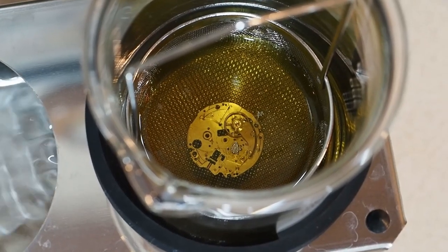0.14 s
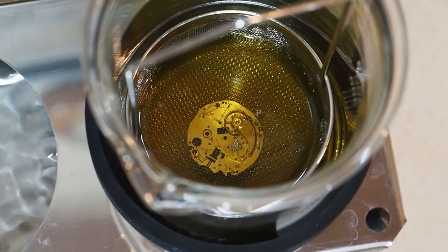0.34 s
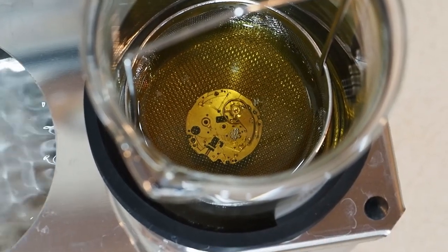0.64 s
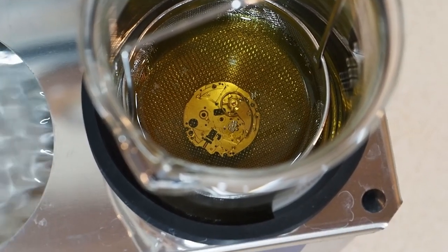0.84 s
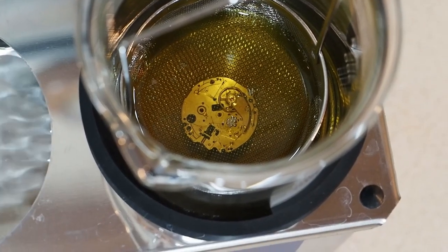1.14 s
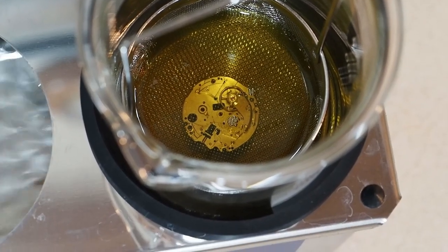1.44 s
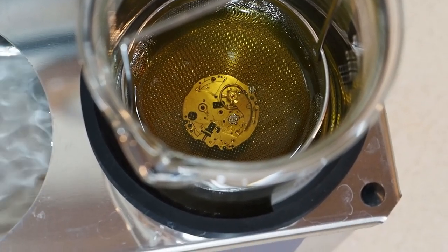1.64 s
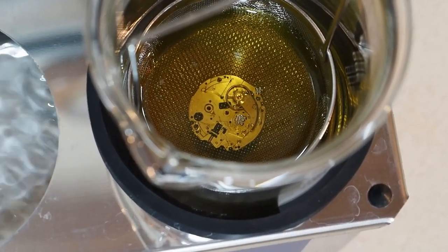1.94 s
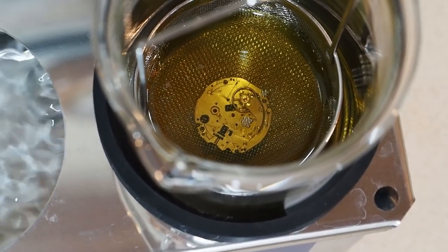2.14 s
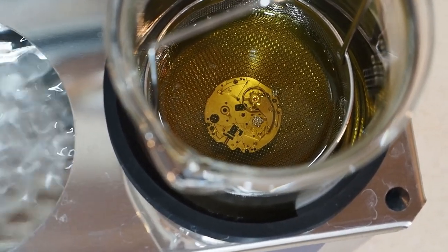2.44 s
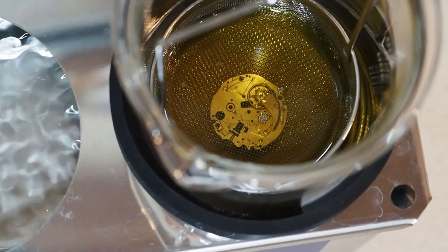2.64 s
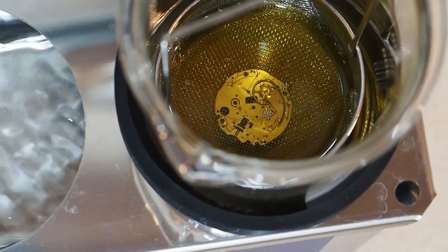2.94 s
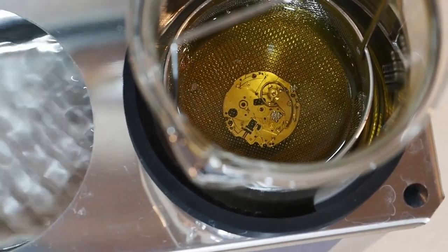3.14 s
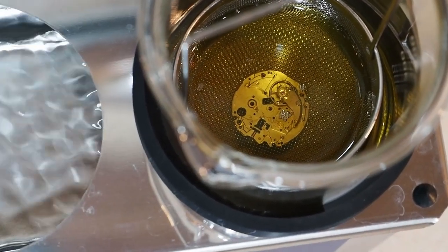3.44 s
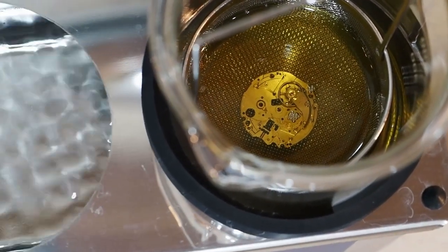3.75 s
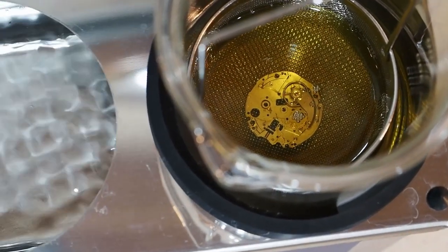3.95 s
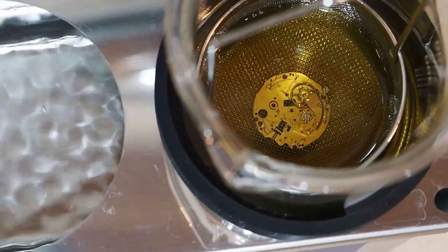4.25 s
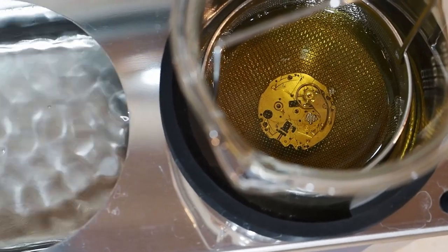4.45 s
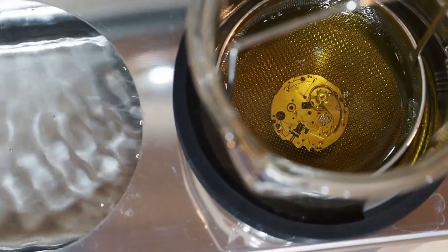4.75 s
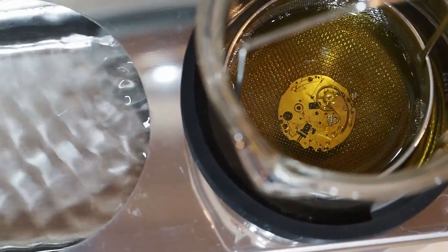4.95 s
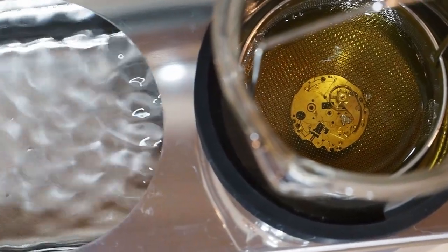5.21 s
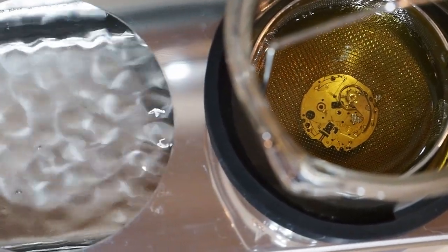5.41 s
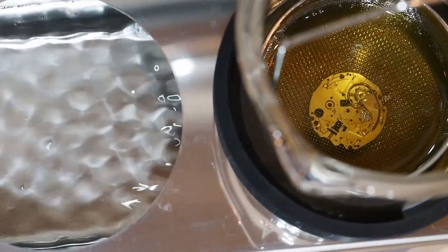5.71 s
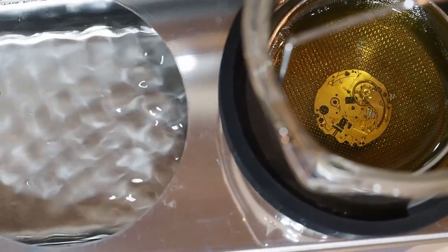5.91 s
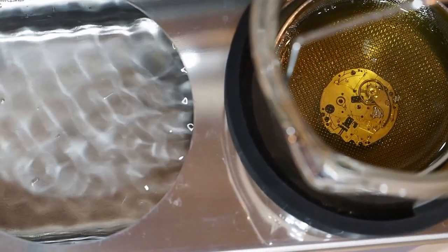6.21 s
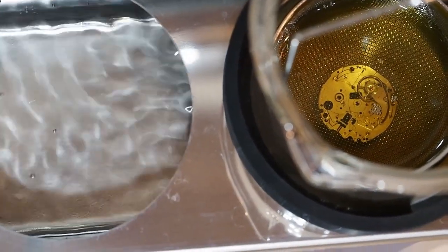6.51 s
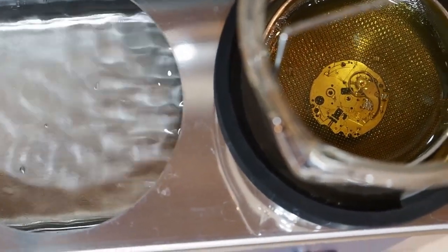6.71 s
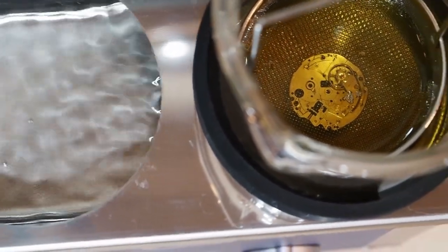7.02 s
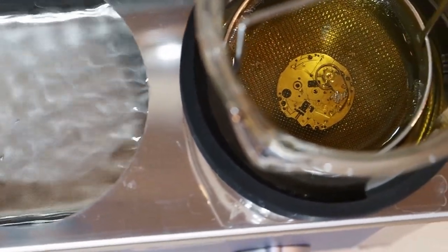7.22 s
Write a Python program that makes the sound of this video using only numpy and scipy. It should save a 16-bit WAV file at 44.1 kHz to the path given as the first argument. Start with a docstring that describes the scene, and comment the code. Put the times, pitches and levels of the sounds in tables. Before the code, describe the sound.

From 0 to about 7.4 seconds an ultrasonic cleaning bath runs without stopping, close to the microphone. It is a bright, dry hiss made of countless tiny bubble collapses, chopped into roughly fifty soft-edged bursts per second, so it buzzes and crackles. Most energy is a sharp fizz around 11 to 16 kHz, with crackle from 2 to 12 kHz and faint ringing of the steel tank. At 0.2 seconds the beaker knocks lightly, a short woolly click; a weaker touch comes at 2.5. The fizz flares briefly near 1.6, 2.5, 4.0, 5.5 and 6.5, with narrow, airy whistles around 2.6 and 6.1. Small dips at 1.6, 2.9, 3.6, 4.5 and 5.7 recover gradually. Faint mains hum and workshop rumble lie far below; a very soft low bump swells at 7.0. The room tail is short.

```python
"""A fast buzz of crackling bursts: an ultrasonic cleaner close by, a glass beaker standing in its steel tank.
The drive swells once per mains cycle and gates random collapses, coloured as crackle, fizz and ringing steel.
The housing hums at mains multiples over a faint workshop rumble, both steady tones and noise drifting slowly.
The beaker knocks lightly (short damped noise), bubble clouds whistle (narrow gated noise), and late on
a soft low bump swells and fades; now and then the whole sound sags and creeps back."""
import sys
import numpy as np
from scipy import signal
from scipy.fft import rfft, irfft, next_fast_len
from scipy.io import wavfile
from scipy.ndimage import uniform_filter1d, map_coordinates

SR = 44100
rng = np.random.default_rng(int(sys.argv[2]) if len(sys.argv) > 2 else 0)


def master(y):
    """Save y as 16-bit WAV."""
    cut = np.clip(np.atleast_2d(y).T, -1, 1)
    pcm = np.round(cut * 32767)  # scale
    wavfile.write(sys.argv[1], SR, pcm.astype(np.int16))


N = 325017

MAINS_HZ, START_PHASE = 50.09, 0.521  # phase as a share of the cycle
CRACKLE_DB, FIZZ_DB, TANK_DB = -44.5, -36.5, -63  # base levels of the bath's three layers
CRACKLE_SHARE = 0.22  # part of a surge's dB that reaches the larger collapses
SAG_S, RECOVER_DB_PER_S = 0.048, 5.5  # fall time and recovery rate of a lull
BUMP_S, BUMP_HALF_S, BUMP_DB = 7.02, 0.07, -60
TOP_HZ = 15830  # middle of the recorder's upper band edge

# strength of cavitation through one mains cycle: (share of the cycle, relative level [dB])
CYCLE_STRENGTH = [(0, -10), (.255, -12), (.34, -4.6), (.42, -1.5), (.49, -1.2), (0.591, -2.5), (0.69, -8),
                  (.82, -10)]
# larger collapses heard through the tank: (frequency [Hz], relative density [dB per Hz])
CRACKLE_COLOUR = [(880, -24), (1500, -20.5), (1970, -14.5), (2080, -13), (2550, -6.5), (3940, -6),
                  (4670, -9), (5010, -4.5), (5530, -5.5), (7150, 0), (8390, -3.5), (9410, 0.5),
                  (10400, 0.5), (11100, -3), (12500, -7.5), (16200, -50.5), (22000, -120)]
# the smallest bubbles: (frequency [Hz], relative density [dB per Hz])
FIZZ_COLOUR = [(9000, -43.5), (11300, -15.5), (11900, -6.5), (12500, -8.5), (13100, -4.5), (13900, 0.5),
               (14400, -5), (15130, 4), (15800, -2)]
# slow drift of the fizz: (time [s], level change [dB])
FIZZ_DRIFT = [(0, 0.17), (1.2, 0.6), (3.1, 0.5), (5.2, -0.5), (6.3, 0.2), (7.37, -1.34)]
# fizz and crackle flare up briefly: (time [s], half length [s], rise of the fizz [dB])
FIZZ_SURGES = [(1.25, 0.079, 1.3), (1.61, .06, 2.5), (2.533, 0.037, 2.2), (3.35, .07, -2.5),
               (3.96, 0.058, 3.5), (4.24, .07, 1.5), (5.46, 0.023, 4), (5.62, .03, 3.5), (6.5, 0.107, 3),
               (7.33, .12, 3)]
# ringing of the steel tank: (frequency [Hz], width [Hz], relative level [dB])
TANK_MODES = [(1161.7, 10, 0.5), (1230.4, 66, 1.5), (1368.7, 109, -6), (2127, 47, -3), (2316, 60, -1.5)]
# stereo width: (frequency [Hz], side minus mid [dB])
STEREO_WIDTH = [(60, -9.5), (130, -3.5), (290, -5.5), (640, -0.5), (1410, -22), (3100, -3.5), (6820, -3),
                (15000, 2)]
# decay of the room's tail: (frequency [Hz], t60 [s])
ROOM_DECAY = [(300, 0.23), (3000, 0.14), (15000, 0.096)]
# tank and room answer most in the midrange: (frequency [Hz], reverberant minus direct [dB])
REVERB_BALANCE = [(1200, -2.5), (2200, 1.5), (4000, -9.5), (8000, -18), (15000, -5.5)]
# housing vibration: (multiple of the mains, relative level [dB])
HUM_LINES = [(1, -8.5), (2, -6.5), (3, -27), (4, -4), (5, 2), (6, -4), (7, -6), (8, -9), (9, -17.5),
             (10, -26), (11, -11.5), (12, -11.5), (13, -12), (14, -34.5), (15, -21)]
# slow drift of the hum and the room's rush: (time [s], level change [dB])
LOW_DRIFT = [(0, -2), (.85, 2), (1.65, -1.62), (2.35, .7), (3.1, -.3), (3.55, 1.4), (4.65, -2), (5.1, 0.67),
             (7.37, -1.02)]
# rumble and rush of the workshop: (frequency [Hz], relative density [dB per Hz])
WORKSHOP_COLOUR = [(12, -39), (20, 4.5), (31, -13), (44, 3), (52, -6), (60, -1.5), (76, -9.5), (103, -1),
                   (165, -9), (247, -3.5), (274, -3.5), (352, -0.5), (476, -9.5), (633, -4.5), (813, -28),
                   (1100, -15), (1430, -16), (2420, -120)]
# deep part of the rumble: (time [s], level [dB])
DEEP_RUMBLE_LEVEL = [(0, -65), (.9, -64.5), (1.8, -65), (4.4, -66), (6.2, -66), (7.37, -66)]
# beaker against tank: (time [s], peak level [dB], frequency [Hz], width [Hz], t60 [s])
BEAKER_KNOCKS = [(0.195, -50.5, 760, 900, 0.045), (0.202, -38, 2390, 1500, 0.0306),
                 (0.258, -51, 1200, 70, .1), (2.517, -50, 1035, 260, 0.065)]
# bubble clouds that ring for a while: (time [s], half length [s], frequency [Hz], level [dB])
CLOUD_WHISTLES = [(1.19, 0.15, 15200, -41.5), (1.639, 0.032, 9560, -43), (2.595, 0.0028, 13900, -31),
                  (2.6, 0.062, 14250, -41), (2.752, 0.21, 9500, -51), (4.204, 0.15, 9590, -47.5),
                  (5.5, 0.064, 10600, -48.5), (6.102, 0.68, 10140, -49.5), (6.12, .05, 15100, -39.5),
                  (7.22, 0.2, 13800, -43)]
# sags of the whole sound: (time [s], hold [s], depth [dB])
LEVEL_LULLS = [(1.629, 0.27, 3), (2.903, 0.23, 1.5), (3.603, .14, 2.5), (4.283, 0.042, 1.5),
               (4.46, 0.21, 3.5), (5.686, 0.053, 2), (6.683, 0.3, -0.15)]
# colour of the soft bump: (frequency [Hz], relative density [dB per Hz])
BUMP_SPECTRUM = [(25, -12), (330, 1), (480, -3), (700, -12), (1300, -15), (3000, -60)]
# the beaker shades the top treble on the left: (frequency [Hz], left minus right [dB])
LEFT_RIGHT_LEAN = [(250, 1.3), (1000, -0.5), (1800, -3.5), (2800, 0.5), (8000, 0.5), (11800, -.7),
                   (13700, -6), (15500, -4)]


def amp(db):
    """Decibels to amplitude."""
    return 10 ** (np.asarray(db) / 20)


def unit(x):
    """x scaled to rms 1."""
    return x / np.sqrt(np.mean(x ** 2) + 1e-20)


def clock():
    """Time of every sample in seconds."""
    return np.arange(N) / SR


def along(points, hz):
    """(Hz, value) points read on a log frequency axis."""
    f, v = np.transpose(points)
    return np.interp(np.log(hz + 1), np.log(f + 1), v)


def curve(points):
    """(time, value) points read at every sample."""
    s, v = np.transpose(points)
    return np.interp(clock(), s, v)


def wobble(rate):
    """A smooth random curve, rate knots a second."""
    knots = rng.standard_normal(int(N * rate / SR) + 4)
    return map_coordinates(knots, [np.arange(N) * rate / SR])


def swell(s, half):
    """A bell-shaped rise and fall round time s, down to 1/e at the half length."""
    return np.exp(-((clock() - s) / half) ** 2)


def filtered(x, response):
    """x shaped by a complex response of frequency."""
    m = next_fast_len(N + SR // 2)
    return irfft(rfft(x, m) * response(np.fft.rfftfreq(m, 1 / SR)), m)[..., :N]


def resonance(f, centre, width):
    """Response of one damped mode."""
    return 1j * f * width / (centre ** 2 - f ** 2 + 1j * f * width)


def spread(pair, response):
    """Two unrelated signals become a coloured left and right, with a mid of rms 1."""
    mid, side = filtered(pair, response)
    side = filtered(side, lambda f: amp(along(STEREO_WIDTH, f)))
    return np.array([mid + side, mid - side]) / (np.std(mid) + 1e-20)


def drive(burst_db):
    """Collapses crowd round one crest of each mains cycle; the bursts vary randomly in strength."""
    turns = MAINS_HZ * clock() + START_PHASE
    phase, db = np.transpose(CYCLE_STRENGTH)
    cycle_db = np.interp(turns % 1, phase, db, period=1)
    return unit(amp(cycle_db + burst_db * wobble(MAINS_HZ)))


def collapses(gate, per_second, snap_db):
    """A dense bed of tiny implosions with single larger snaps standing out."""
    struck = rng.random(N) < per_second / SR * gate
    snaps = unit(struck * rng.standard_normal((2, N)) * np.sqrt(gate))
    bed = gate * rng.standard_normal((2, N))
    return bed + amp(snap_db) * snaps


def cavitation(gate, clump_db, flutter_db, steepness):
    """Clumps of imploding bubbles crackle, fizz and set the tank ringing."""
    surge_db = sum(db * swell(s, half) for s, half, db in FIZZ_SURGES)
    crackle_db = CRACKLE_DB + CRACKLE_SHARE * surge_db
    fizz_db = FIZZ_DB + curve(FIZZ_DRIFT) + surge_db + flutter_db * wobble(50)

    clumps = gate * amp(clump_db * wobble(500))
    large = collapses(clumps, per_second=1200, snap_db=-12.5)
    crackle = spread(large, lambda f: amp(along(CRACKLE_COLOUR, f)))
    # the finest bubbles follow the drive more steeply
    fine = collapses(clumps ** steepness, per_second=1100, snap_db=-7.5)
    fizz = spread(fine, lambda f: amp(along(FIZZ_COLOUR, f)))

    def steel(f):
        modes = sum(amp(db) * resonance(f, hz, width) for hz, width, db in TANK_MODES)
        return modes / (1 + (1000 / (f + 1)) ** 8)  # little below 1 kHz

    # the walls sum collapses from the whole bath, so they ring more evenly
    tank = spread(gate ** 0.41 * rng.standard_normal((2, N)), steel)
    return amp(crackle_db) * crackle + amp(TANK_DB) * tank + amp(fizz_db) * fizz


def drifting(x, depth_db):
    """Ripples on the bath keep shifting the colour of its sound in small patches."""
    z = signal.stft(x, nperseg=512)[2]
    field = rng.standard_normal(z.shape[1:])
    for _ in range(2):
        field = uniform_filter1d(field, size=3, axis=0)  # across frequency
        field = uniform_filter1d(field, size=14, axis=1)  # across time
    return signal.istft(z * amp(depth_db * unit(field)), nperseg=512)[1][:, :N]


def room(x, count=30):
    """A short diffuse tail, treble dying first; its paths change as water and microphone move."""
    out, step = np.zeros((2, N + SR)), N // count + 1
    for start in range(-step, N, step):
        hz, t, z = signal.stft(rng.standard_normal((2, SR // 4)), SR, nperseg=256)
        decay = np.exp(-np.log(1000) * t / along(ROOM_DECAY, hz)[:, None])
        tail = signal.istft(z * decay, SR, nperseg=256)[1]
        # overlapping windows pass the sound from one tail to the next
        span = np.arange(max(start, 0), min(start + 2 * step, N))
        piece = x[:, span] * np.sin(np.pi * (span - start) / (2 * step))
        wet = signal.fftconvolve(piece, tail / np.linalg.norm(tail[0]), axes=1)
        out[:, span[0]:span[0] + wet.shape[1]] += wet
    return out[:, :N]


def hum(level_db, waver_db):
    """The housing vibrates at multiples of the mains, each a little unsteady."""
    turns = MAINS_HZ * clock()
    lines = np.zeros(N)
    for k, db in HUM_LINES:
        tone = np.sin(2 * np.pi * (k * turns + rng.random()))
        lines += amp(db + waver_db * wobble(5)) * tone
    return amp(level_db + curve(LOW_DRIFT)) * unit(lines)


def workshop(upper_db, split_hz):
    """Low rumble of the room and a softer rush above it, both coloured noise."""
    colour = lambda f: amp(along(WORKSHOP_COLOUR, f))
    low = lambda f: 1 / (1 + (f / split_hz) ** 8)  # share of power in the rumble
    deep = spread(rng.standard_normal((2, N)), lambda f: colour(f) * np.sqrt(low(f)))
    upper = spread(rng.standard_normal((2, N)), lambda f: colour(f) * np.sqrt(1 - low(f)))
    return amp(curve(DEEP_RUMBLE_LEVEL)) * deep + amp(upper_db + curve(LOW_DRIFT)) * upper


def knocks():
    """Each light contact of beaker and tank gives a short, woolly ring of decaying noise."""
    out = np.zeros(N)
    for s, db, hz, width, t60 in BEAKER_KNOCKS:
        age = clock() - s
        decay = (age > 0) * np.exp(-np.log(1000) * np.abs(age) / t60)
        rattle = decay * rng.standard_normal(N)
        ring = filtered(rattle, lambda f: resonance(f, hz, width) * resonance(f, hz, 2 * width))
        out += amp(db) * ring / np.abs(ring).max()
    return out


def whistles(gate, width_hz):
    """Bubbles of one size ring together in a narrow band, pulsing with the drive."""
    out = np.zeros((2, N))
    for s, half, hz, db in CLOUD_WHISTLES:
        ring = spread(gate * rng.standard_normal((2, N)), lambda f: resonance(f, hz, width_hz) ** 2)
        out += amp(db) * swell(s, half) * ring
    return out


def sag():
    """Level in dB: each lull drops fast, holds and recovers at a fixed rate."""
    out = np.zeros(N)
    for s, hold, depth_db in LEVEL_LULLS:
        corners = s + np.cumsum([0, SAG_S, hold, depth_db / RECOVER_DB_PER_S])
        out -= np.interp(clock(), corners, [0, depth_db, depth_db, 0])
    return out


def bump():
    """A soft, low bump of noise swells and fades without a ring."""
    noise = spread(rng.standard_normal((2, N)), lambda f: amp(along(BUMP_SPECTRUM, f)))
    return amp(BUMP_DB) * swell(BUMP_S, BUMP_HALF_S) * noise


def scene():
    """The close bath in its room, over hum and rumble; all of it sags in the lulls."""
    gate = drive(burst_db=0.57)
    bath = drifting(cavitation(gate, clump_db=1.0, flutter_db=0.5, steepness=1.2), depth_db=1.0)
    bath = bath + whistles(gate, width_hz=960)

    # direct and reverberant power share the total at each frequency
    wet_ratio = lambda f: amp(along(REVERB_BALANCE, f))
    direct = lambda f: 1 / np.sqrt(1 + wet_ratio(f) ** 2)
    bath = filtered(bath, direct) + filtered(room(bath), lambda f: direct(f) * wet_ratio(f))

    background = hum(level_db=-62.0, waver_db=1.74) + workshop(upper_db=-68.5, split_hz=230)
    mix = (bath + knocks() + bump() + background) * amp(sag())
    return filtered(mix, lambda f: amp(np.outer([0.5, -0.5], along(LEFT_RIGHT_LEAN, f))))


def record(dry):
    """The recorder keeps nothing above its band limit; the edge is a ramp 80 Hz wide."""
    return filtered(dry, lambda f: np.clip((TOP_HZ - f) / 80 + 0.5, 0, 1))


dry = scene()
out = record(dry)
master(out)
```